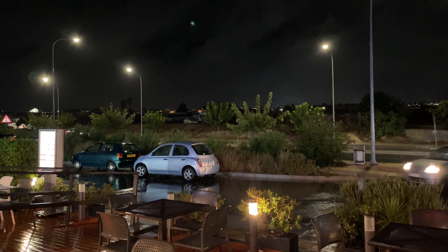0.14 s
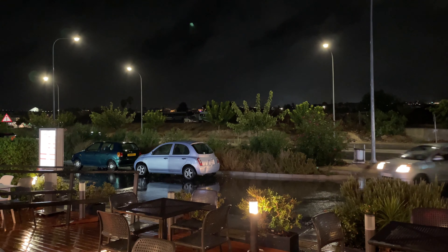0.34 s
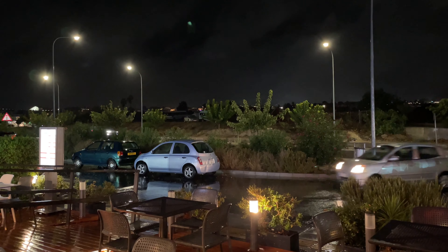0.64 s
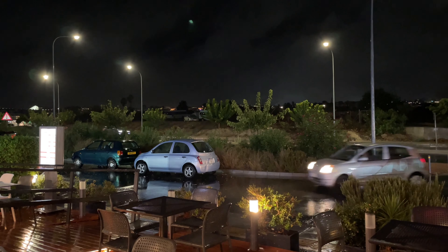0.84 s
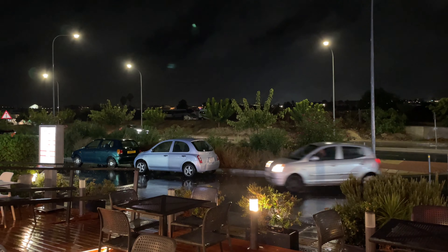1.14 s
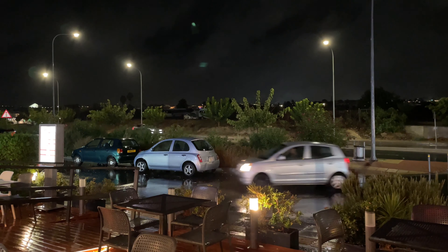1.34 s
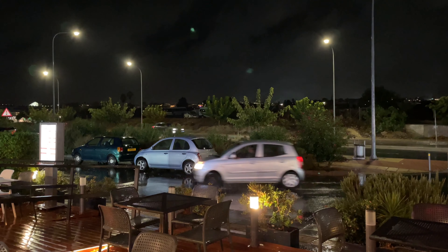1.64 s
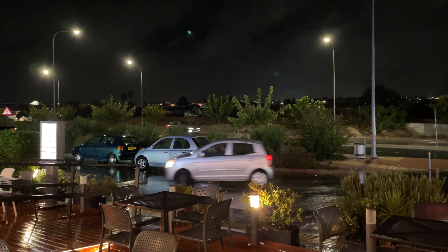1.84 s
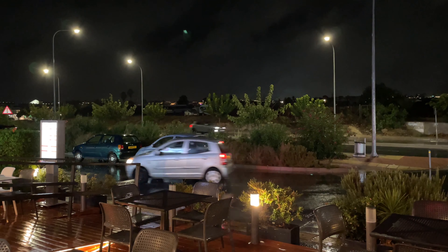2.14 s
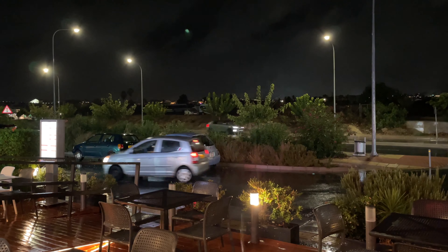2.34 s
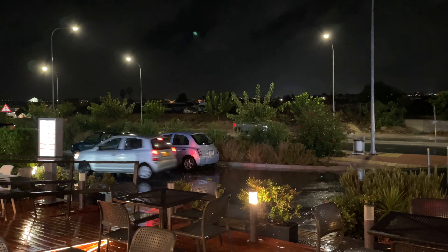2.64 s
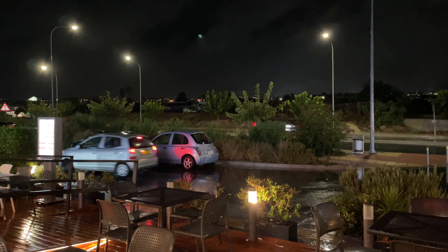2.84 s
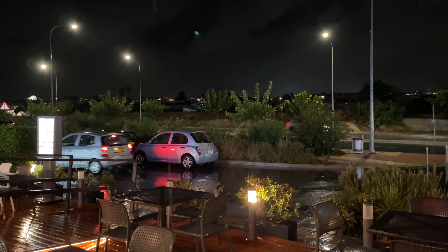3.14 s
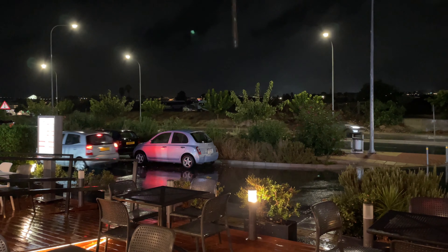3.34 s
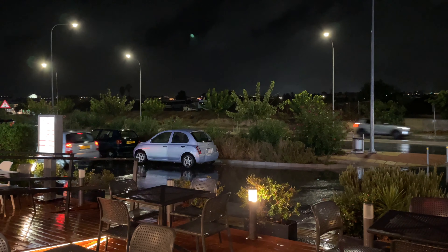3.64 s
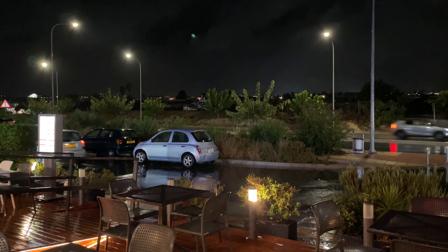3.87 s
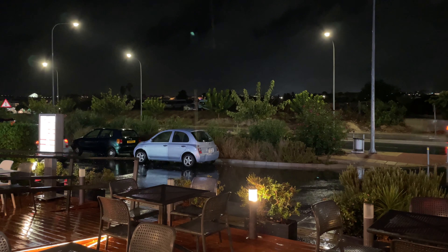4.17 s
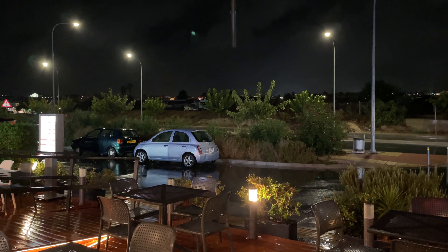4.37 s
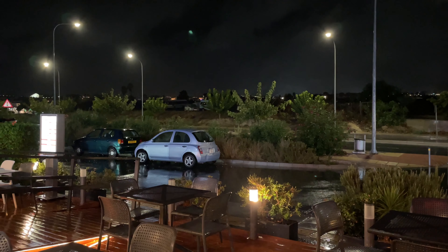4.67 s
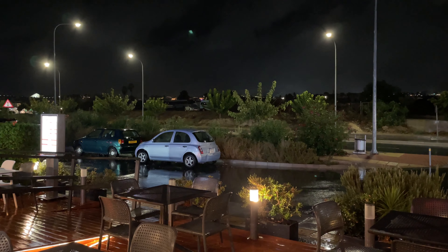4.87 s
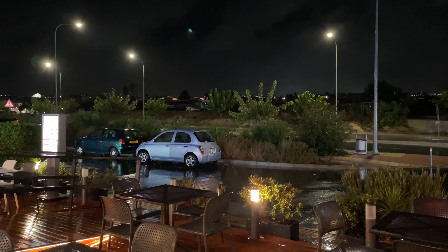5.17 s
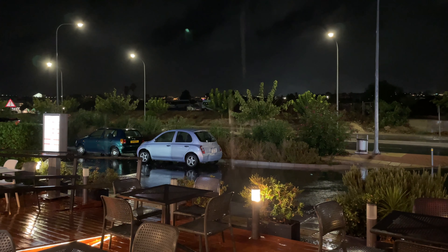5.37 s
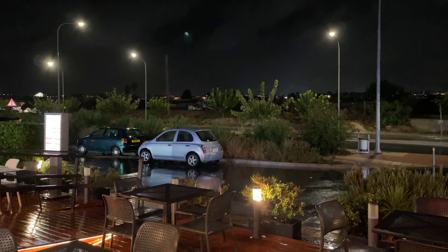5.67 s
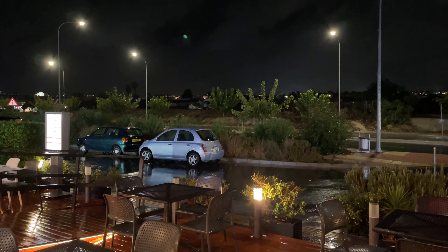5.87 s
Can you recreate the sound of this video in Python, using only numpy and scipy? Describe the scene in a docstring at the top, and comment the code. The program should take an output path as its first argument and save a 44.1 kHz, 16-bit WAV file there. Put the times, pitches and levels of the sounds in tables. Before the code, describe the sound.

Outdoor night downpour with plinking puddles; a small car swishes past with tyre spray and pulsing engine hum, then rain and distant traffic remain.

```python
"""A covered terrace beside a car park, at night, in heavy rain on wet paving and puddles.
Rain and splashes are showers of random impacts shaped in tone; bubbles are short rising plinks.
A small car rolls through the puddles: spray, heavy water, tyre roar and a wavering engine drone.
Close drips tick, the brakes squeal once, and two vehicles drone on the road behind, over traffic rumble."""
import sys
import numpy as np
from scipy import signal
from scipy.fft import rfft, irfft
from scipy.io import wavfile
from scipy.ndimage import uniform_filter1d

SR = 44100
rng = np.random.default_rng(int(sys.argv[2]) if len(sys.argv) > 2 else 0)


def to_wav(sig):
    """Store sig (one row per channel, or 1-D mono) as 16-bit WAV at the path in sys.argv[1].

    Samples outside -1..1 are clipped; the rate is SR.
    """
    pcm = np.clip(np.atleast_2d(sig), -1, 1) * 32767
    pcm = np.round(pcm).astype(np.int16)
    wavfile.write(sys.argv[1], SR, pcm.T)  # frames by channels


def volts_from_decibels(level):
    """Turn decibel levels (scalar or array-like) into linear amplitude factors."""
    exponent = np.asarray(level, float) / 20
    return 10 ** exponent


N = 264776
TIME = np.arange(N) / SR  # s
FREQ = np.maximum(np.fft.rfftfreq(N, 1 / SR), 1)  # Hz, kept above 0 for logarithms

# Colours give the relative strength of each pitch region, per Hz of width.
# Rain colour: [f/Hz, level/dB]
RAIN_COLOUR = [(120, -39), (200, -3), (300, -7), (450, -8), (600, -11.5), (1000, -6.5), (1900, -10.5),
               (2770, -14), (4500, -19.5), (6900, -24.5), (8500, -25), (10000, -33), (11500, -42),
               (12800, -45), (14000, -44), (15700, -47)]
# Tyre spray between puddles: [t/s, level/dB, brightness at 10 kHz/dB]
SPRAY_LEVEL = [(0, -40.5, 8.5), (.3, -39, 4), (.6, -37, 3.5), (1, -38, 5), (1.3, -37, 2), (2, -39, -1),
               (2.45, -41, 0.5), (2.8, -40.5, -3), (3.1, -39, -10.5), (3.3, -40, -13), (3.6, -47.5, -3),
               (4.3, -46, -10), (4.6, -43, -5), (5, -43, -4.5), (5.5, -42, -5), (6, -47.5, -2)]
# Spray colour: [f/Hz, level/dB]
SPRAY_COLOUR = [(180, -19), (300, -7.5), (500, -3), (900, -8.5), (1550, 0.5), (3180, -5.5), (5000, -9.5),
                (6900, -15.5), (8500, -16), (10000, -21), (11500, -27.5), (12800, -31), (14000, -26),
                (15700, -33)]
# Puddles crossed: [t/s, length/s, spray lift/dB, brightness lift/dB, heavy water level/dB]
PUDDLES = [(0.04, 0.1, 0.5, -2, -46), (0.4, 0.22, 2, 0.5, -44), (0.696, 0.15, 1.5, -0.5, -40),
           (0.953, 0.34, 2.5, 0, -43), (1.2, 0.15, 1, -1.5, -50), (1.478, 0.22, 1, 4.5, -55),
           (1.877, 0.27, 1.5, 2, -45), (2.27, 0.22, 2, -3, -44), (2.62, .15, 1, 1, -54),
           (2.798, 0.25, 3, 2, -45), (3.05, 0.13, 1, 0.5, -53)]
# Colour of the heavy water: [f/Hz, level/dB]
WASH_COLOUR = [(900, -30), (1400, 3), (2200, 2.5), (3200, -0.5), (4500, -20), (9000, -50)]
# Roar of the tyres: [t/s, level/dB]
TYRE_ROAR = [(0, -44.5), (2.1, -44.5), (2.8, -46.5), (3.6, -45.5), (4.3, -46), (4.6, -51.5), (5.3, -53),
             (6, -51)]
# Colour of the tyre roar: [f/Hz, level/dB]
TYRE_COLOUR = [(450, -20), (700, 3), (880, 9), (1080, 2.5), (1400, -24.5)]
# Traffic rumble: [t/s, level/dB]
RUMBLE_LEVEL = [(0, -36), (1.7, -35), (2.0, -36.5), (3.0, -38), (3.6, -35.5), (4.5, -37), (4.8, -38.5),
                (6, -40)]
# Colour of the rumble: [f/Hz, level/dB]
RUMBLE_COLOUR = [(15, -45), (30, -19), (45, -5), (62, -1), (85, -1.5), (115, -6), (160, -6.5), (210, -14),
                 (300, -17), (600, -30.5), (900, -80)]
# Main drone of the small car, 4 times the shaft rate: [t/s, level/dB]
CAR_MAIN = [(0, -32.5), (.2, -30), (.3, -33.5), (.46, -26.5), (.53, -34), (.62, -26), (.7, -28.5),
            (.83, -37.5), (.92, -30), (1, -33.5), (1.11, -26.5), (1.2, -37), (1.33, -38), (1.44, -32),
            (1.57, -41), (1.7, -31.5), (1.8, -32.5), (1.87, -42), (1.94, -29.5), (2.05, -33.5),
            (2.22, -32.5), (2.32, -42), (2.42, -32.5), (2.58, -42), (2.75, -38), (2.92, -35), (3.1, -42),
            (3.45, -38), (3.6, -44), (3.72, -35.5), (3.85, -35), (4.02, -43), (4.18, -38), (4.4, -41),
            (4.65, -53), (4.85, -35), (5, -50), (5.1, -41), (5.23, -50), (5.42, -39.5), (5.7, -42),
            (5.82, -50), (5.93, -36.5), (6, -44)]
# Rougher car drones below it: [t/s, level at 2 times the shaft rate/dB, level at 3 times/dB]
CAR_LOW = [(0, -36.5, -44), (.6, -38, -47), (.95, -43, -54), (1.05, -38, -43), (1.4, -38, -40),
           (1.6, -43, -42), (1.8, -40, -35.5), (1.95, -42, -46), (2.1, -36.5, -38), (2.6, -39.5, -41),
           (2.79, -33, -44), (2.98, -43, -38), (3.16, -34, -42), (3.3, -34, -41), (3.42, -43, -40),
           (3.55, -31, -45), (3.7, -39, -41.5), (4.1, -44, -43), (4.5, -51, -44), (6, -57, -47)]
# Car drones above it: [multiple of the shaft rate, level while the spray is loudest/dB]
CAR_UPPER = [(5, -54.5), (8, -59.5), (10, -52)]
# Single drops close by: [t/s, level/dB, left minus right/dB]
DRIPS = [(1.5825, -28, -2), (5.040, -32, 0), (5.0575, -39, -2)]
# Vehicle pulling away on the road behind: [t/s, f/Hz, level/dB]
PULLING_AWAY = [(3.65, 142.7, -43), (4.1, 155.7, -48), (4.3, 161.2, -49.5), (4.5, 170.8, -46),
                (4.72, 176, -46)]
# Heavy vehicle on the road behind: [t/s, f/Hz, level/dB]
HEAVY_VEHICLE = [(4.5, 59, -42), (4.62, 59, -37), (4.75, 60, -39), (4.88, 60, -33), (5.05, 60.5, -30),
                 (5.2, 59, -37), (5.3, 58, -31.5), (5.42, 57, -34.5), (5.58, 56, -29.5), (5.75, 56, -35),
                 (6, 57, -38)]
# Brief runs of fine splashes close by: [t/s, length/s, level/dB]
PATTER_RUNS = [(5.56, .25, -55.5), (5.74, 0.13, -54.5), (5.98, .25, -56.5)]
# Colour of the fine splashes: [f/Hz, level/dB]
PATTER_COLOUR = [(6000, -32), (8300, -3), (9600, -1), (10600, -12), (13000, -27)]
# How alike left and right are; around 11-12 kHz nearly the same, from 13.8 kHz nearly opposite:
# [f/Hz, likeness 0-1, right behind left/rad]
LIKENESS = [(60, .8, 0), (300, .7, -.2), (650, .12, -.5), (900, .28, 0), (1300, .2, 3), (1850, .43, 3.4),
            (2500, .1, 4.5), (3000, .18, 6.9), (4000, .2, 5.5), (4600, .1, 7.5), (5500, .33, 9.4),
            (6500, .55, 11.7), (7400, .33, 12.6), (8500, .38, 15.6), (10200, .36, 13.2),
            (11100, .98, 12.57), (12400, .98, 12.57), (13200, .3, 13.5), (13800, .99, 15.7),
            (16000, .99, 15.7)]
# How the two microphone ports differ in level: [f/Hz, left minus right/dB]
PORTS = [(30, -1), (60, 4.5), (110, 1.5), (200, 3), (360, 3), (660, 5.5), (1200, 2.0), (2180, -1.5),
         (3960, 0), (7200, -1.5), (12000, -4.5), (13800, 0.5)]
# Dips and peaks of the microphone housing: [f/Hz, width/Hz, level/dB]
HOUSING = [(1170, 450, -2), (5540, 1300, 2), (6470, 770, 2)]


def over_time(table):
    """Every column after the first, with straight lines between its rows, over all samples."""
    s, *columns = np.transpose(table)
    return [np.interp(TIME, s, column) for column in columns]


def over_freq(table, column=1):
    """Draws one column of a table over every frequency, with straight lines on a log scale."""
    columns = np.transpose(table)
    return np.interp(np.log(FREQ), np.log(columns[0]), columns[column])


def bump(s, length):
    """A smooth swell from 0 to 1 and back, centred on s."""
    return np.exp(-(2 * (TIME - s) / length) ** 2)


def walk(rate):
    """Random levels, rate of them per second, smoothed into a wandering curve of spread near 1."""
    hold = int(SR / rate)
    steps = np.repeat(rng.standard_normal(N // hold + 1), hold)
    return 1.3 * uniform_filter1d(uniform_filter1d(steps, hold), hold)[:N]


def drops(per_s, spread_db):
    """Two unrelated showers of impacts, many small and a few large."""
    hit = rng.random((2, N)) < per_s / SR
    size = volts_from_decibels(spread_db * rng.exponential(size=(2, N)))
    return hit * rng.standard_normal((2, N)) * size


def diffuse(shower, colour, swell_db, flicker_db, bright_db=0):
    """Sound from all around, partly shared by left and right; octaves swell together and flicker alone."""
    like, lag = over_freq(LIKENESS), over_freq(LIKENESS, 2)
    left, other = rfft(shower) * volts_from_decibels(over_freq(colour))
    right = like * np.exp(-1j * lag) * left + np.sqrt(1 - like ** 2) * other
    pair = np.array([left, right])
    pair /= np.sqrt(np.mean(irfft(pair, N) ** 2))  # the colour sets tone only, not loudness
    octave = np.log2(FREQ / 10000)
    swell = swell_db * walk(3.83)
    out = 0
    for centre in range(int(np.log2(colour[0][0] / 10000)), 2):
        # neighbouring octaves overlap and add up to 1
        share = np.cos(np.pi / 2 * np.clip(octave - centre, -1, 1)) ** 2
        # brightness counts fully at 10 kHz, half an octave lower, and so on
        tilt_db = bright_db * 2. ** centre
        out = out + irfft(pair * share, N) * volts_from_decibels(swell + flicker_db * walk(6.5) + tilt_db)
    return out


def drone(hz, db, rough, rough_rate):
    """A tone whose strength and phase waver at random; rough is the amount, without added loudness."""
    waver = 1 + rough * (walk(rough_rate) + 1j * walk(rough_rate))
    wave = np.imag(waver * np.exp(2j * np.pi * np.cumsum(hz) / SR))
    return np.sqrt(2) * volts_from_decibels(db) * wave / np.sqrt(1 + 2 * rough ** 2)


def span(start, end, fade_s):
    """A gate that is open from start to end, with a straight fade at either side."""
    return uniform_filter1d(1. * (TIME > start) * (TIME < end), int(fade_s * SR))


def passing(table, rough, rough_rate, fade_s):
    """A tone that is heard only for the span of its table."""
    hz, db = over_time(table)
    return span(table[0][0], table[-1][0], fade_s) * drone(hz, db, rough, rough_rate)


def rain():
    """Countless drops strike the paving all around and blur into a steady hiss."""
    return volts_from_decibels(-38.5) * diffuse(drops(40000, 0.42), RAIN_COLOUR, 0.27, 0.92)


def bubbles():
    """Bubbles left by drops in the puddles: short plinks that rise a little in pitch as they die."""
    per_s, middle_hz, spread_oct = 260, 2400, .45
    cycles, glide = 28.7, .06  # glide: share of the pitch gained in that many cycles
    level_db, size_spread_db, pan_spread_db, lag_samples = -52, 3, 4, 5
    count = int(per_s * N / SR)
    at, size = rng.random((count, 2)).T
    pitch, place, lag = rng.standard_normal((count, 3)).T
    hz = (middle_hz * 2 ** (spread_oct * np.clip(pitch, -2, 2)))[:, None]
    turns = TIME[:1024] * hz
    age = turns / cycles
    plink = age * np.exp(1 - 3 * age) * np.sin(2 * np.pi * turns * (1 + glide * age / 2))
    plink = plink * volts_from_decibels(-size_spread_db * np.log(1 - size))[:, None]
    out = []
    for side in (1, -1):  # left, right
        start = (at * N + side * lag_samples * lag).astype(int)[:, None]
        i = start + np.arange(plink.shape[1])
        heard = plink * volts_from_decibels(side * pan_spread_db * place / 2)[:, None]
        out.append(np.bincount((i % N).ravel(), heard.ravel(), N))
    out = np.array(out)
    return out * volts_from_decibels(level_db) / np.sqrt(np.mean(out ** 2))


def spray():
    """Fine water flung from the tyres, lifted in each puddle; also gives its level below its loudest."""
    db, bright_db = over_time(SPRAY_LEVEL)
    for s, length, lift_db, bright_lift_db, _ in PUDDLES:
        db = db + lift_db * bump(s, length)
        bright_db = bright_db + bright_lift_db * bump(s, length)
    pan_db = -0.05 - 0.34 * TIME  # left minus right: drifts to the right
    hiss = diffuse(drops(40000, 0.9), SPRAY_COLOUR, 0.5, 1.06, bright_db)
    return hiss * volts_from_decibels(db + np.array([pan_db, -pan_db]) / 2), db - db.max()


def wash():
    """Heavy water thrown up in each puddle, in coarser splashes, over a faint steady wash."""
    thrown = volts_from_decibels(-53.5) + sum(volts_from_decibels(db) * bump(s, length) for s, length, _, _, db in PUDDLES)
    return thrown * diffuse(drops(15000, 2.8), WASH_COLOUR, 0.4, 1.0)


def tyre_roar():
    """Tyres on the ground: noise in a narrow region around 900 Hz."""
    level_db, = over_time(TYRE_ROAR)
    return volts_from_decibels(level_db) * diffuse(rng.standard_normal((2, N)), TYRE_COLOUR, 1.0, 0.93)


def rumble():
    """Traffic as a low, slowly changing noise."""
    level_db, = over_time(RUMBLE_LEVEL)
    return volts_from_decibels(level_db) * diffuse(rng.standard_normal((2, N)), RUMBLE_COLOUR, .4, .6)


def car_engine(near_db):
    """Drones at multiples of the shaft rate, which creeps up; the upper ones follow the spray's level."""
    hz = 26.04 + .42 * TIME
    main_db, = over_time(CAR_MAIN)
    car = drone(4 * hz, main_db, 0.12, 12.)
    # uneven cylinders: rough tones below the main one
    for multiple, db in enumerate(over_time(CAR_LOW), 2):
        car = car + drone(multiple * hz, db, 0.2, 14.)
    for multiple, db in CAR_UPPER:
        car = car + drone(multiple * hz, db + near_db, 0.65, 12.)
    return car


def drips():
    """Drops landing near the microphone: thin bright ticks of two fast-dying tones."""
    out = np.zeros((2, N))
    t = TIME[:200]
    tick = np.exp(-t / 0.0002) * np.sin(2 * np.pi * 12700 * t)
    tick = tick + 0.4 * np.exp(-t / 0.0008) * np.sin(2 * np.pi * 7300 * t)
    for s, db, pan_db in DRIPS:
        i = int(s * SR)
        out[:, i:i + len(t)] += tick * volts_from_decibels(db + np.array([[pan_db], [-pan_db]]) / 2)
    return out


def pulling_away():
    """An engine on the road behind, its wavering drone climbing in pitch."""
    return passing(PULLING_AWAY, 0.35, 6.5, 0.28)


def squeal():
    """The brakes sing once: a thin high tone, a little stronger on the left, that fades in and out."""
    start_s, length_s, fade_s, hz, level_db = 4.13, .22, .06, 7201, -57
    tone = drone(np.full(N, hz), level_db, .08, 39.6)
    return span(start_s, start_s + length_s, fade_s) * tone * volts_from_decibels([[1.5], [-1.5]])


def heavy_vehicle():
    """A heavy engine on the road behind: a very low drone that pulses in level."""
    return passing(HEAVY_VEHICLE, 0.11, 4.5, 0.21)


def patter():
    """Brief runs of fine splashes close by: sparser impacts, heard mostly in the treble."""
    runs = sum(volts_from_decibels(db) * bump(s, length) for s, length, db in PATTER_RUNS)
    return runs * diffuse(drops(9900, 2.), PATTER_COLOUR, 0.54, 0.82)


def scene():
    """Adds up the rain, the passing car, the drips and the road behind."""
    water, near_db = spray()
    wet = rain() + bubbles() + water + wash() + drips() + patter()
    car = tyre_roar() + car_engine(near_db) + squeal()
    road = rumble() + pulling_away() + heavy_vehicle()
    return wet + car + road


def roll_off(x):
    """The treble ends steeply here."""
    return signal.sosfilt(signal.butter(12, 15720, fs=SR, output="sos"), x)


def record(dry):
    """The microphone housing colours the sound, and its two ports differ in level."""
    tilt = over_freq(PORTS) / 2
    housing = sum(db * np.exp(-((FREQ - hz) / width) ** 2) for hz, width, db in HOUSING)
    housing += -2 * (FREQ / 13500) ** 4  # the very top fades: 2 dB lost at 13.5 kHz
    mix = irfft(rfft(dry) * volts_from_decibels(housing + np.array([tilt, -tilt])), N)
    return roll_off(mix)


dry = scene()
out = record(dry)
to_wav(out)
```